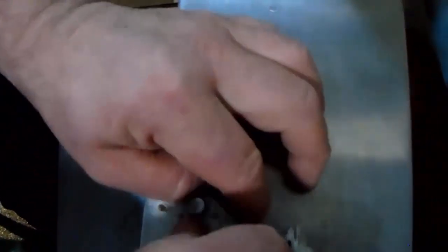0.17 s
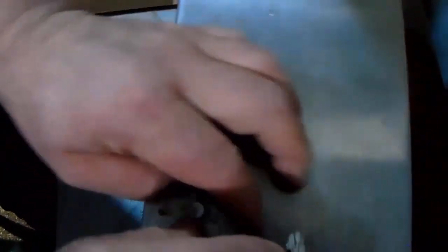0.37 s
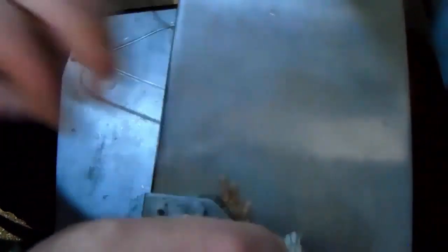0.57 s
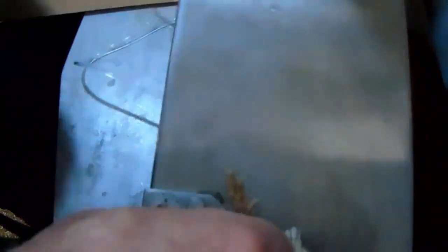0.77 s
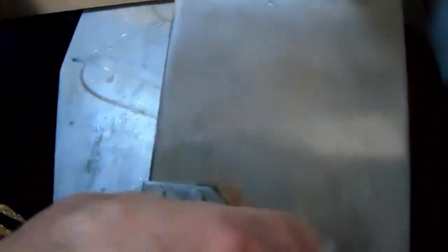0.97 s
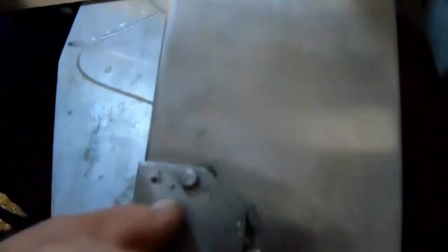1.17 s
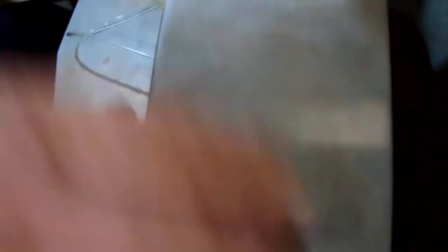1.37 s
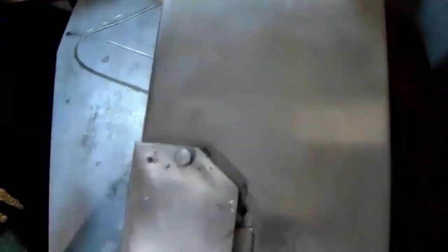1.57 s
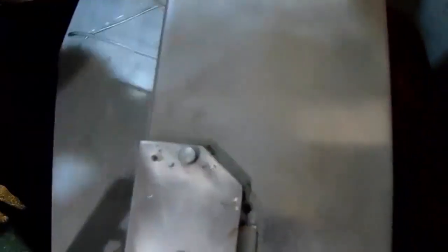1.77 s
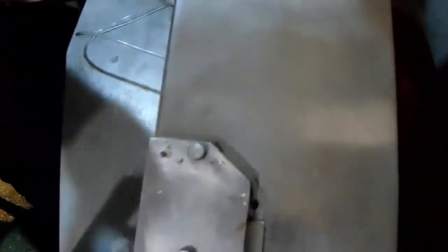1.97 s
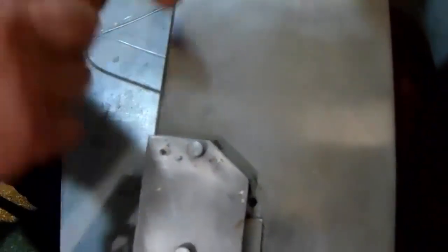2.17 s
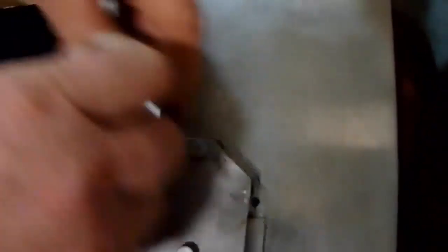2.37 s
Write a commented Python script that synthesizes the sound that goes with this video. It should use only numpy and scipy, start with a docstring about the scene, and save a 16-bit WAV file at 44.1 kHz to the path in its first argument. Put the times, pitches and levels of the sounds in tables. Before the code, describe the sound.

Day-old chicks peep close and far in a box indoors; a sharp knock on a steel plate, a duller clunk and short scrapes follow, then trilling chirps, over faint hum, picked up close with a slightly gritty digital edge.

```python
"""A low hum and room tone run throughout, with day-old chicks calling faintly in an indoor box.
Two near peeps, one warbled, lead to a slide and a knock on a steel plate; a third peep and a duller clunk follow.
After a soft peep and short slides come a trill, a high peep and another trill while the room tone sinks.
Chicks are gliding whistles with overtones, the plate is struck modes and noise, and the slides are grainy noise.
The recorder's uneven sample timing puts faint mirror tones around every peep."""
import sys
import numpy as np
from scipy import signal
from scipy.fft import rfft
from scipy.io import wavfile

SR = 44100
rng = np.random.default_rng(int(sys.argv[2]) if len(sys.argv) > 2 else 0)


def transcribe(signal):
    """Save signal, clipped to [-1, 1], as a 16-bit WAV file at the path in sys.argv[1]."""
    frames = np.atleast_2d(signal).T
    limited = np.clip(frames, -1, 1)
    pcm = np.round(limited * 32767).astype(np.int16)
    wavfile.write(sys.argv[1], SR, pcm)


N = 110250
TIME = np.arange(N) / SR


def from_db(db):
    """Decibels to gain."""
    return 10 ** (np.asarray(db) / 20)


def rms_one(x):
    """Scale to rms 1."""
    return x / np.sqrt(np.mean(x ** 2) + 1e-20)


def low_pass(x, hz, order=2):
    """Butterworth low-pass."""
    return signal.sosfilt(signal.butter(order, min(hz, SR / 2 - 500), fs=SR, output="sos"), x)


def drift(hz):
    """Random wavering up to about the given rate, rms 1."""
    settled = low_pass(rng.standard_normal(N + SR), hz)[SR:]
    return rms_one(settled)


def noise(spectrum):
    """Noise coloured by a curve of Hz and relative dB per Hz, scaled to rms 1."""
    hz, db = np.transpose(spectrum)
    bin_hz = np.arange(N // 2 + 1) * SR / N
    colour = np.interp(np.log(bin_hz + 1), np.log(hz), db)
    return rms_one(np.fft.irfft(rfft(rng.standard_normal(N)) * from_db(colour), N))


def burst(start, rise, t60):
    """Straight rise, then an exponential decay of 60 dB per t60."""
    decay_time = np.maximum(TIME - start - rise, 0)
    return np.clip((TIME - start) / rise, 0, 1) * from_db(-60 * decay_time / t60)


def glide(t, s, values):
    """Smooth curve through the points, level at every turning point."""
    step = np.maximum(np.diff(s), 1e-4)
    slope = np.diff(values) / step
    a, b = slope[:-1], slope[1:]
    # harmonic mean of neighbouring slopes, so the curve does not overshoot
    inner = np.where(a * b > 0, 2 * a * b / (a + b + 1e-9), 0)
    tangent = np.r_[slope[0], inner, slope[-1]]
    k = np.clip(np.searchsorted(s, t) - 1, 0, len(step) - 1)
    u = np.clip((t - s[k]) / step[k], 0, 1)
    bend = (1 - u) * (tangent[k] - slope[k]) - u * (tangent[k + 1] - slope[k])
    return values[k] + step[k] * u * (slope[k] + (1 - u) * bend)


# Colour of the room tone. Each row: frequency in Hz, relative density in dB per Hz.
FLOOR = [(20, -19), (42, 4.5), (60, -5.5), (130, -2.5), (300, -12), (700, -14.5), (1600, -19), (3800, -12),
         (6500, -20.5), (10000, -14), (15500, -39)]
# Loudness of the room tone, which sinks at the end. Each row: time in seconds, rms level in dB.
FLOOR_LEVEL = [(0, -43), (.55, -47.5), (1.2, -44), (1.75, -46), (2.1, -47.5), (2.4, -49)]


def room_tone():
    """Coloured noise whose level wanders slowly."""
    return from_db(np.interp(TIME, *np.transpose(FLOOR_LEVEL))) * noise(FLOOR)


HUM_HZ, HUM_RMS_DB, HUM_WAVER_SHARE = 199.4, -51, 0.067


def low_hum():
    """One steady low sine whose strength wavers slowly."""
    tone = np.sqrt(2) * np.sin(2 * np.pi * HUM_HZ * TIME)
    return from_db(HUM_RMS_DB) * tone * (1 + HUM_WAVER_SHARE * drift(2))


# Strokes of hand and plate over the steel.
# Each row: start in seconds, rise in seconds, die-away t60 in seconds, level in dB before the grain.
SLIDES = [(-.01, 0.0068, 0.28, -40), (.43, .1, 0.1, -45), (.66, 0.11, 0.17, -33.5),
          (1.33, 0.031, 0.27, -31), (1.399, 0.008, 0.26, -33), (1.553, 0.0088, 0.45, -38)]
# Colour of the swish. Each row: frequency in Hz, relative density in dB per Hz.
SLIDE_COLOUR = [(40, -30), (200, -11), (1200, -8.5), (2500, -2), (4500, 1.5), (6500, -6), (9000, 5.5),
                (12000, -6), (15500, -20)]
SLIDE_GRAIN_DB = 4  # rms swing of the grain


def plate_slides():
    """Friction over the steel: short noise swishes with rapid random level changes."""
    stroke = sum(from_db(db) * burst(s, rise, t60) for s, rise, t60, db in SLIDES)
    grain = from_db(SLIDE_GRAIN_DB * drift(300))
    return stroke * noise(SLIDE_COLOUR) * grain


# Booms of the housing at two of the blows.
# Each row: start in seconds, frequency in Hz, level in dB, die-away t60 in seconds.
BOOMS = [(.756, 146.3, -33.5, 0.35), (1.036, 212.2, -30, 0.38)]


def housing_booms():
    """Low, dying tones of the sheet-steel housing."""
    return sum(from_db(db) * burst(s, 0.0069, t60) * np.sin(2 * np.pi * hz * (TIME - s))
               for s, hz, db, t60 in BOOMS)


# Blows on the plate. Each row: start in seconds, ring drive in dB before softening, thud level in dB,
# crack level in dB, contact softness as a low-pass corner in Hz.
BLOWS = [(0.7531, -20.5, -20, -24, 9000), (0.756, -19, -27.5, -23.5, 9000),
         (0.935, -44.5, -37.5, -32.5, 6000), (1.031, -28, -22, -35, 830), (1.046, -33, -29, -28.5, 1500),
         (1.061, -40, -37.5, -29, 3000), (1.33, -40, -62, -24.5, 7000)]
# Modes of the plate. Each row: frequency in Hz, gain in dB before a random change per blow, t60 in seconds.
PLATE_MODES = [(403, -17.5, 0.2), (524, -11.5, 0.2), (734.5, -11.5, 0.18), (820, -2.5, 0.063),
               (1300, -8, 0.036), (1982, -14, 0.092), (2560, 9, .03), (2729, 9, .03), (3285, -3, 0.052),
               (5280, -6, 0.094), (8100, -34, .1)]
# Colour of the thud. Each row: frequency in Hz, relative density in dB per Hz.
THUD_COLOUR = [(40, -22), (130, 6), (280, -1.5), (650, 9.5), (1100, 1.5), (1700, -13), (2700, -12),
               (5000, -35)]
# Colour of the contact crack. Each row: frequency in Hz, relative density in dB per Hz.
CRACK_COLOUR = [(40, -36), (200, -21), (800, -3), (2700, 1.5), (5000, -3), (9000, 1.5), (15000, -16)]
THUD_T60_S, CRACK_T60_S = 0.14, 0.13


def plate_blows():
    """Each blow rings the plate's modes, thuds in the housing and cracks at the contact."""
    out, pushes = np.zeros(N), []
    for s, ring_db, thud_db, crack_db, soft_hz in BLOWS:
        click = np.zeros(N)
        click[int(s * SR)] = from_db(ring_db)
        pushes.append(low_pass(click + 1e-18, soft_hz, order=1))
        out += from_db(thud_db) * burst(s, 0.0012, THUD_T60_S) * noise(THUD_COLOUR)
        out += from_db(crack_db) * burst(s, 0.00037, CRACK_T60_S) * noise(CRACK_COLOUR)
    for hz, db, t60 in PLATE_MODES:
        radius, angle = from_db(-60 / (t60 * SR)), 2 * np.pi * hz / SR
        # each blow excites the mode a little differently
        drive = from_db(db + rng.normal(0, 1.5, len(BLOWS))) @ np.array(pushes)
        resonator = [1, -2 * radius * np.cos(angle), radius * radius]
        out += signal.lfilter([0, np.sin(angle)], resonator, drive)
    return out


JITTER_SHARE, FLUTTER_HZ = 0.057, 327  # pitch shake at roughness 1, top rate of the shaking
THIRD_HARMONIC_DB = -4.5  # against the octave overtone
HALF_PITCH_DB = -20  # half-pitch tone against the one at one and a half times the pitch
BEAK_CUT_HZ = 11450


def syrinx(hz, overtone_db, rough, split=0):
    """A whistle with two overtones; roughness shakes its pitch and strength, a split adds half-pitch tones."""
    jitter, shimmer = (rms_one(low_pass(w, FLUTTER_HZ)) for w in rng.standard_normal((2, len(hz))))
    phase = 2 * np.pi * np.cumsum(hz * (1 + JITTER_SHARE * rough * jitter)) / SR
    overtones = np.sin(2 * phase) + from_db(THIRD_HARMONIC_DB) * np.sin(3 * phase)
    halves = np.sin(1.5 * phase) + from_db(HALF_PITCH_DB) * np.sin(phase / 2)
    whistle = np.sin(phase) + from_db(overtone_db) * overtones + split * halves
    return low_pass(whistle * (1 + rough * shimmer), BEAK_CUT_HZ, order=4)


# Gliding peeps of the chicks further back, pitches before a slight waver.
# Each row: start in seconds, length in seconds, start pitch in Hz, end pitch in Hz, whistle peak in dB.
FAR_PEEPS = [(.374, 0.02, 3936, 2150, -27.5), (0.418, 0.071, 3870, 2850, -38),
             (0.528, 0.058, 4840, 4120, -47), (.735, 0.061, 4200, 3590, -26),
             (1.038, 0.12, 4020, 3960, -42.5), (1.131, 0.046, 3870, 3260, -37),
             (1.183, 0.03, 4660, 4520, -50), (1.226, .03, 5360, 4800, -39.5),
             (1.254, 0.018, 4350, 3020, -30.5), (1.475, 0.085, 4064, 3803, -29.5),
             (1.495, 0.034, 5580, 4800, -36), (1.539, 0.022, 3520, 2840, -30.5),
             (1.758, 0.082, 5600, 5310, -41.5), (1.802, 0.02, 4240, 3630, -28.5),
             (1.813, 0.044, 3740, 2950, -28), (2.016, 0.15, 4140, 3330, -47.5),
             (2.088, 0.05, 5460, 4780, -37.5), (2.112, 0.063, 3950, 2685, -26.5),
             (2.263, 0.082, 4020, 3755, -39), (2.477, 0.042, 4700, 5570, -34.5)]
GLIDE_BEND, FAR_OVERTONE_DB, FAR_ROUGH = 1.5, -18, 0.31
FAR_WAVER_SHARE, FAR_WAVER_HZ = 0.01, 68
BROOD_PEEPS_PER_S, BROOD_LENGTH_S, BROOD_DB = 14, .08, -51.5
BROOD_LOW_HZ, BROOD_HIGH_HZ = 3470, 5240  # range of starting pitches


def far_chicks():
    """Single falling or rising glides from further back, over the faint random peeping of the whole brood."""
    brood = []
    for place, high, fall in rng.random((int(BROOD_PEEPS_PER_S * N / SR), 3)):
        hz = BROOD_LOW_HZ + high * (BROOD_HIGH_HZ - BROOD_LOW_HZ)
        brood.append((place * N / SR, BROOD_LENGTH_S, hz, hz * (0.24 + 0.33 * fall), BROOD_DB))
    out = np.zeros(N)
    waver = 1 + FAR_WAVER_SHARE * drift(FAR_WAVER_HZ)
    for start, length, from_hz, to_hz, db in FAR_PEEPS + brood:
        on = (TIME > start) & (TIME < start + length)
        if on.sum() > 10:
            u = (TIME[on] - start) / length
            pitch = from_hz + (to_hz - from_hz) * u ** GLIDE_BEND
            swell = from_db(db) * np.sin(np.pi * u)
            out[on] += swell * syrinx(pitch * waver[on], FAR_OVERTONE_DB, FAR_ROUGH)
    return out


# Pitch and loudness curves of the near calls, before roughness.
# Each row: time in seconds, pitch in Hz, whistle peak level in dB.
WARBLED_PEEP = [(0.178, 3987, -34), (0.19, 4760, -30), (0.205, 5078, -22.5), (0.226, 5440, -22),
                (0.234, 4704, -4.5), (0.242, 4830, -4.5), (0.256, 5255, -14), (0.269, 4783, -8),
                (0.277, 3394, -15.5), (0.283, 3465, -20.5), (0.29, 4506, -9), (0.303, 4178, -21),
                (0.309, 3377, -19), (0.321, 2795, -25)]
SECOND_PEEP = [(0.555, 4004, -43.5), (0.593, 4320, -37), (0.602, 4680, -17), (0.618, 4910, -15),
               (0.645, 5203, -17), (0.655, 5180, -14.5), (0.663, 4644, -7), (0.669, 3468, -18.5),
               (0.68, 3295, -25), (0.692, 2900, -28.5)]
THIRD_PEEP = [(0.912, 4510, -80), (0.925, 4918, -21), (0.95, 5290, -27), (0.975, 5412, -27.5),
              (0.997, 5370, -27), (1.003, 4863, -11.5), (1.009, 3550, -25), (1.02, 3413, -29.5),
              (1.035, 2704, -36.5)]
SOFT_PEEP = [(1.276, 4480, -53), (1.295, 5002, -27), (1.32, 5330, -31), (1.331, 5094, -27.5),
             (1.338, 3940, -22.5), (1.352, 4310, -25.5), (1.365, 4530, -30)]
FIRST_TRILL = [(1.575, 4330, -38), (1.588, 5180, -51), (1.599, 4534, -19), (1.607, 3210, -27.5),
               (1.615, 3998, -21), (1.626, 5560, -30), (1.636, 4460, -17.5), (1.646, 3251, -24.5),
               (1.656, 3865, -29), (1.668, 5740, -32.5), (1.682, 4070, -22), (1.694, 2793, -34.5),
               (1.705, 4025, -29)]
HIGH_PEEP = [(1.843, 4160, -41), (1.855, 5410, -33), (1.874, 5940, -20.5), (1.89, 6116, -8.5),
             (1.912, 5950, -11), (1.931, 6047, -13), (1.945, 5940, -21), (1.955, 5425, -18),
             (1.966, 5480, -20), (1.982, 4900, -27), (1.993, 2840, -39)]
SECOND_TRILL = [(2.138, 4060, -29.5), (2.157, 5234, -30.5), (2.169, 4704, -17), (2.18, 4577, -16.5),
                (2.197, 5974, -33), (2.211, 4090, -20), (2.22, 3930, -19), (2.235, 5792, -36),
                (2.247, 5720, -30), (2.256, 3960, -22), (2.269, 3434, -31)]
# Voice of each near call, before breaks and cracks add to it.
# Each row: curve, octave overtone in dB, roughness as a share, send to room and box in dB.
NEAR_CALLS = [(WARBLED_PEEP, -20.5, 0.029, -8), (SECOND_PEEP, -25.5, .02, -8.5),
              (THIRD_PEEP, -12.5, 0.027, -6), (SOFT_PEEP, -20, 0.07, -4.5),
              (FIRST_TRILL, -17.5, 0.28, -6.5), (HIGH_PEEP, -9.5, 0.018, -9),
              (SECOND_TRILL, -16.5, 0.24, -4.3)]
# Moments where a near voice cracks. Each row: centre in seconds, half width in seconds,
# change of roughness, added overtone in dB, half-pitch tones in dB against the whistle.
VOICE_CRACKS = [(0.686, 0.014, .15, 19, 3.5), (1.02, 0.012, -0.25, 13, -24), (1.857, 0.014, 0.21, 12.5, 4),
                (1.955, 0.0045, 0.74, 10, -16), (1.965, 0.0056, 0.13, 0, 0)]
ATTACK_S, RELEASE_S = 0.0029, 0.0032
BREAK_HZ, BREAK_WIDTH_HZ = 4050, 175  # below this pitch the voice turns hoarse and rich
BREAK_OVERTONE_DB, BREAK_ROUGH = 9, 0.18


def near_chicks():
    """Loud calls glide, warble and break hoarsely at low pitch; returns direct sound and room send."""
    out, send = np.zeros((2, N))
    at, width, crack_rough, crack_db, split_db = np.transpose(VOICE_CRACKS)
    for curve, overtone_db, rough, send_db in NEAR_CALLS:
        s, hz, db = np.transpose(sorted(curve))
        on = (TIME > s[0] - ATTACK_S) & (TIME < s[-1] + RELEASE_S)
        t = TIME[on]
        pitch = glide(t, s, hz)
        hoarse = (1 + np.tanh((BREAK_HZ - pitch) / BREAK_WIDTH_HZ)) / 2
        cracks = np.exp(-((t[:, None] - at) / width) ** 2)
        gate = np.clip(np.minimum((t - t[0]) / ATTACK_S, (t[-1] - t) / RELEASE_S), 0, 1)
        richness_db = overtone_db + BREAK_OVERTONE_DB * hoarse + cracks @ crack_db
        roughness = rough + BREAK_ROUGH * hoarse + cracks @ crack_rough
        voice = syrinx(pitch, richness_db, roughness, cracks @ from_db(split_db))
        call = gate * from_db(glide(t, s, db)) * voice
        out[on] += call
        send[on] += from_db(send_db) * call
    return out, send


# Reflections from the box and the steel. Each row: delay in seconds, level in dB.
REFLECTIONS = [(.0031, -21.5), (.0074, -23), (0.0139, -21.5), (.021, -17)]


def reflections(x):
    """Close surfaces return the calls, which beat against themselves as they glide."""
    return sum(from_db(db) * np.interp(TIME - delay, TIME, x, left=0) for delay, db in REFLECTIONS)


BOX_T60_S, BOX_ONSET_S, BOX_TREBLE_HZ = 0.062, 0.0026, 5120


def box(x):
    """Dense early scatter between the walls of the box, which soak up the top."""
    scatter = rng.standard_normal(N) * burst(0, BOX_ONSET_S, BOX_T60_S)
    scatter /= np.sqrt(np.sum(scatter ** 2))
    return low_pass(signal.fftconvolve(x, scatter)[:N], BOX_TREBLE_HZ, order=6)


ROOM_ONSET_S, ROOM_T60_S = 0.0077, 0.31
ROOM_TREBLE_HZ, ROOM_TREBLE_T60_S = 6300, 0.19
LINGER_HZ, LINGER_HALF_WIDTH_HZ, LINGER_T60_S = 3730, 440, 0.39
LINGER_DB = -11  # starting density against the white part of the tail


def room(x):
    """Diffuse tail of the room; the treble dies first, one band lingers."""
    white = rng.standard_normal((3, N))
    # shift low-passed noise up to the lingering band
    slow = rms_one(low_pass(white[2], LINGER_HALF_WIDTH_HZ, order=4))
    band = slow * np.cos(2 * np.pi * LINGER_HZ * TIME)
    band *= from_db(LINGER_DB) * np.sqrt(8 * LINGER_HALF_WIDTH_HZ / SR)
    tail = low_pass(white[0], ROOM_TREBLE_HZ, order=4) * burst(0, ROOM_ONSET_S, ROOM_T60_S)
    tail += white[1] * burst(0, ROOM_ONSET_S, ROOM_TREBLE_T60_S)
    tail += band * burst(0, ROOM_ONSET_S, LINGER_T60_S)
    tail /= np.sqrt(2 * np.sum(tail ** 2))  # tail energy one half
    return signal.fftconvolve(x, tail)[:N]


# sends in dB; the near calls also carry their own
ROOM_FAR_DB, ROOM_PLATE_DB = -4.5, -20
BOX_NEAR_DB, BOX_FAR_DB = -4, -9.5


def scene():
    """Chicks and plate in the room, over hum and room tone."""
    background = low_hum() + room_tone()
    plate = plate_slides() + housing_booms() + plate_blows()
    far = far_chicks()
    near, near_send = near_chicks()
    chicks = near + far
    wet = room(near_send + from_db(ROOM_FAR_DB) * far + from_db(ROOM_PLATE_DB) * plate)
    wet += box(from_db(BOX_NEAR_DB) * near_send + from_db(BOX_FAR_DB) * far)
    return (background + plate + chicks + reflections(chicks) + wet)[None]


CAPTURE_RATE, CUTOFF_HZ = 48000, 15600  # samples per second, top of the sound


def record(dry):
    """The recorder lowers its rate by dropping samples, which mirrors each tone; then the top is cut."""
    captured = signal.resample(dry, N * CAPTURE_RATE // SR, axis=1)
    kept = captured[:, np.arange(N) * CAPTURE_RATE // SR]
    top_cut = signal.ellip(10, .05, 60, CUTOFF_HZ, fs=SR, output="sos")
    return signal.sosfiltfilt(top_cut, kept)


dry = scene()
out = record(dry)
transcribe(out)
```